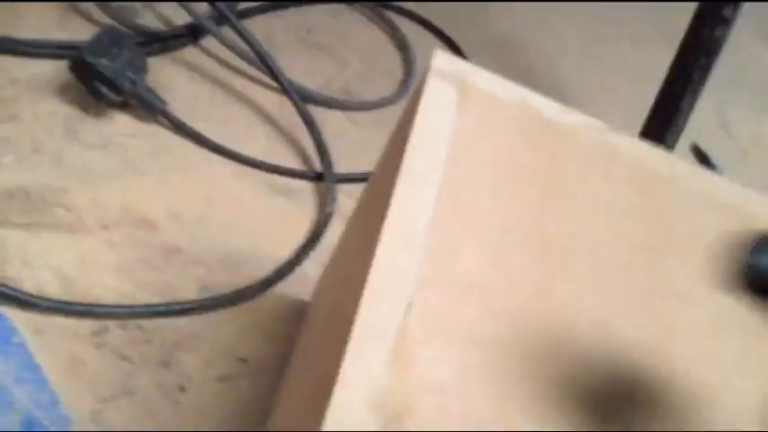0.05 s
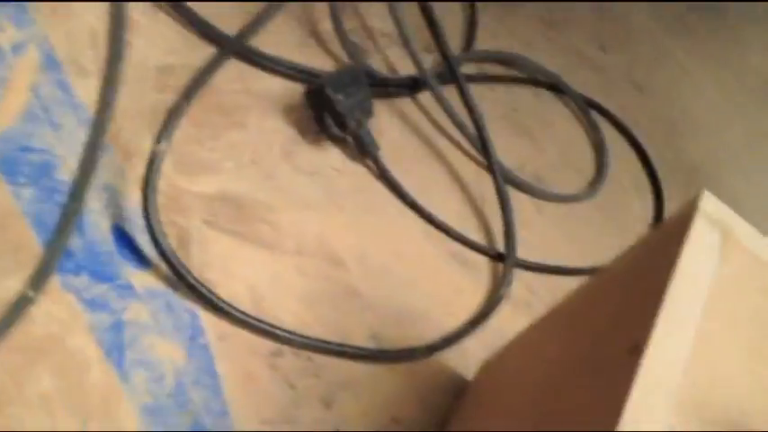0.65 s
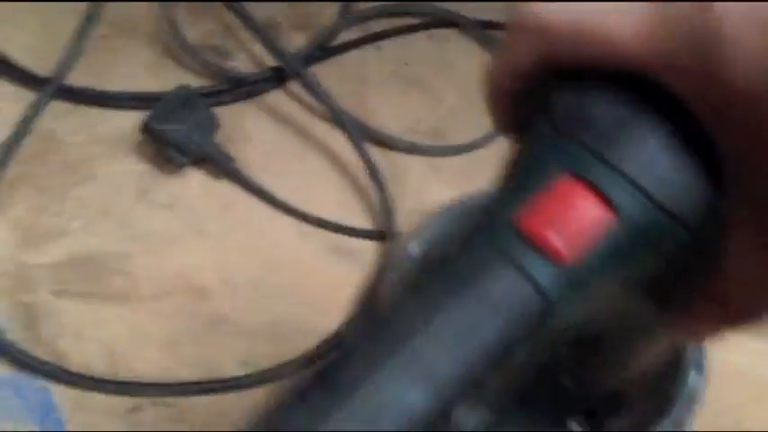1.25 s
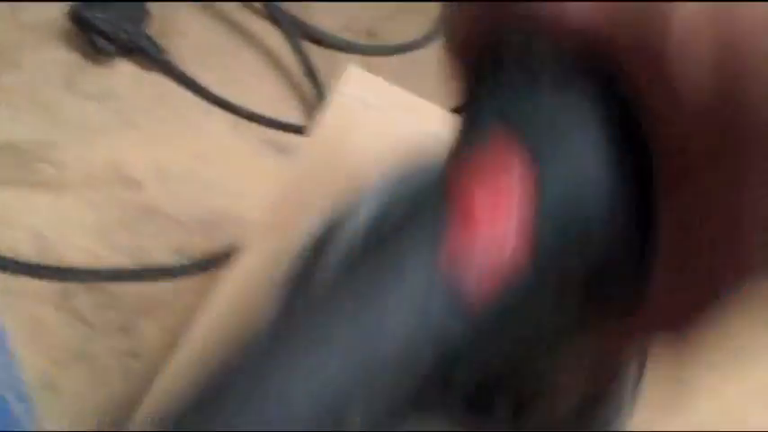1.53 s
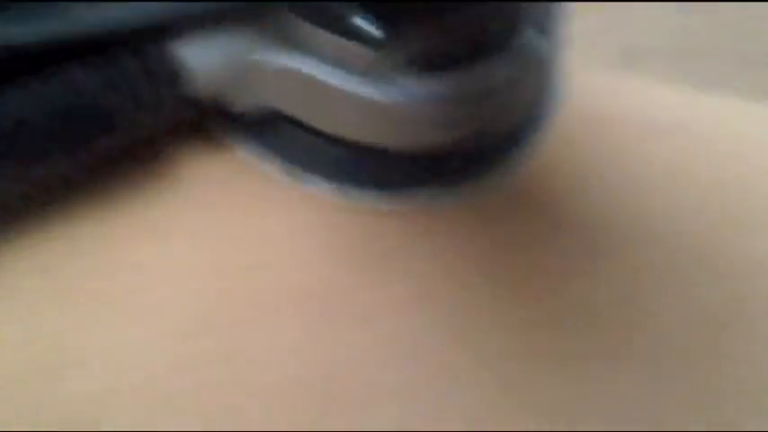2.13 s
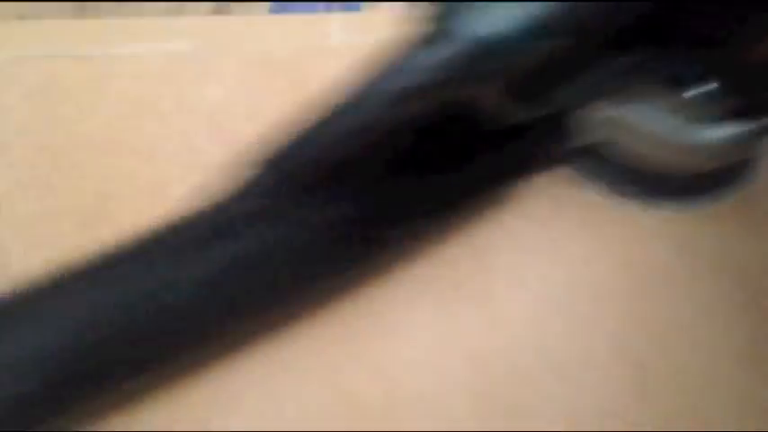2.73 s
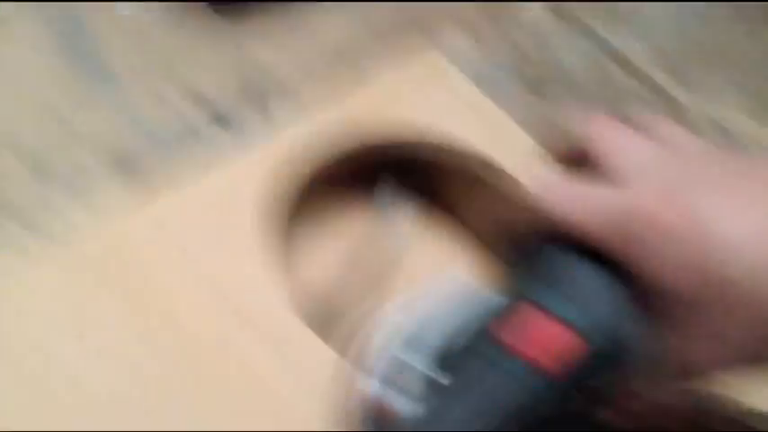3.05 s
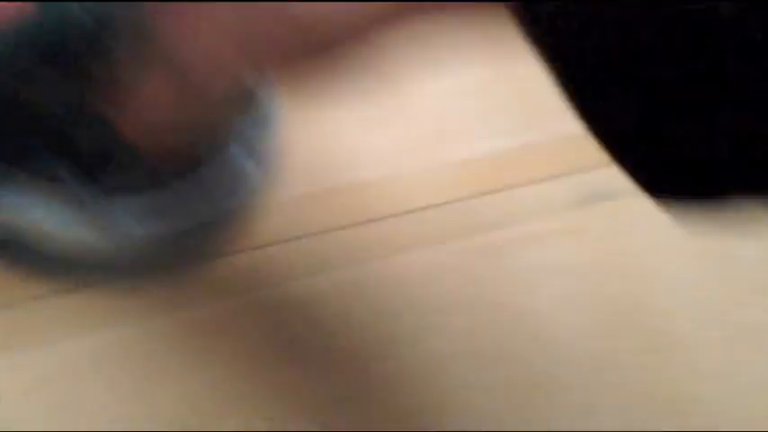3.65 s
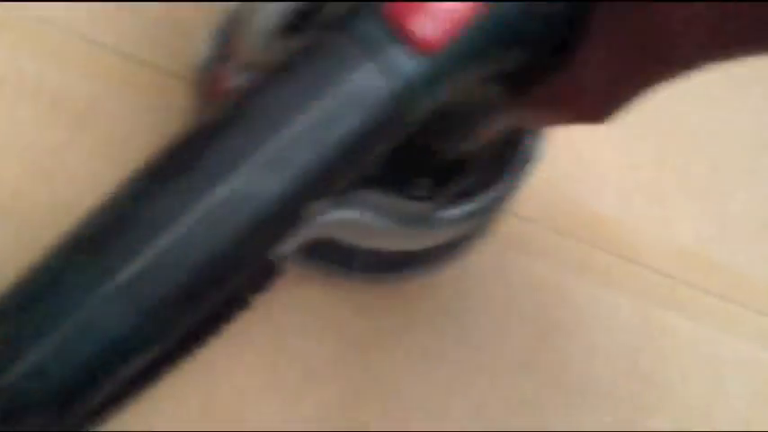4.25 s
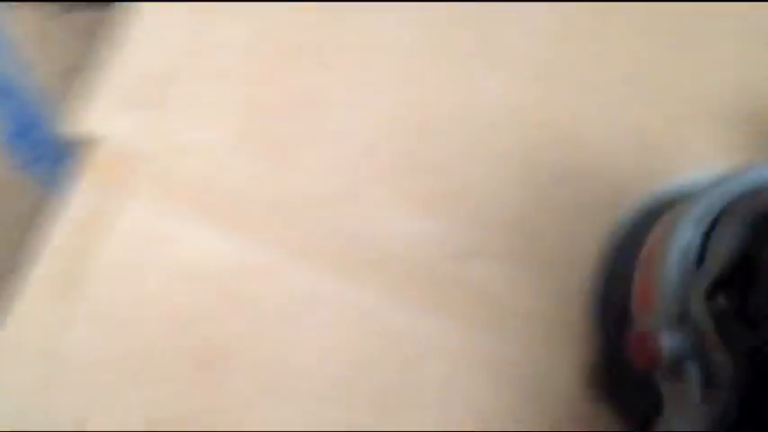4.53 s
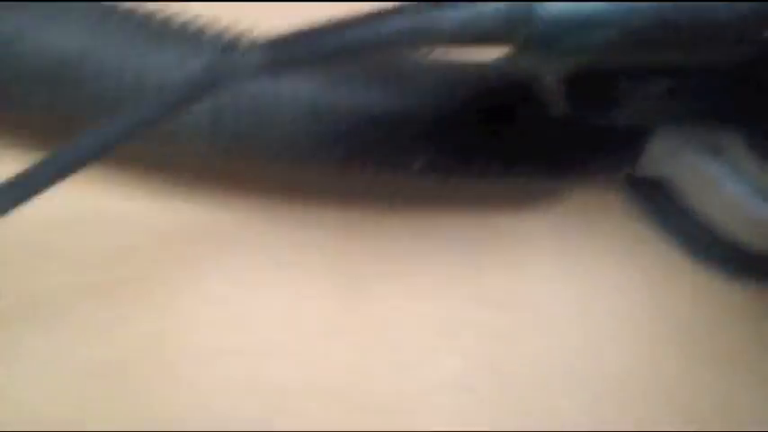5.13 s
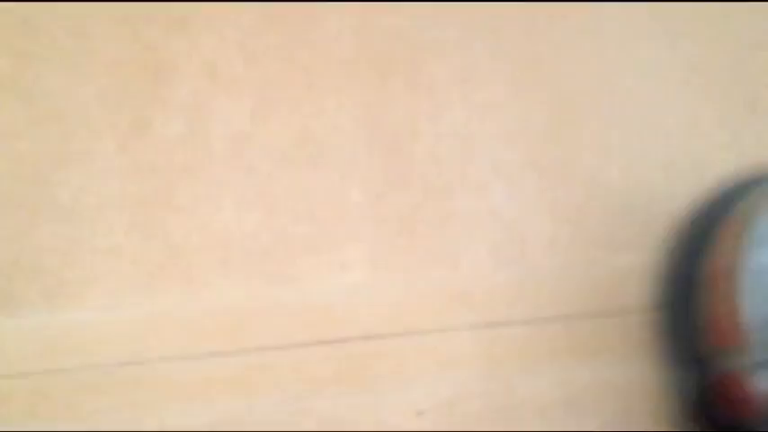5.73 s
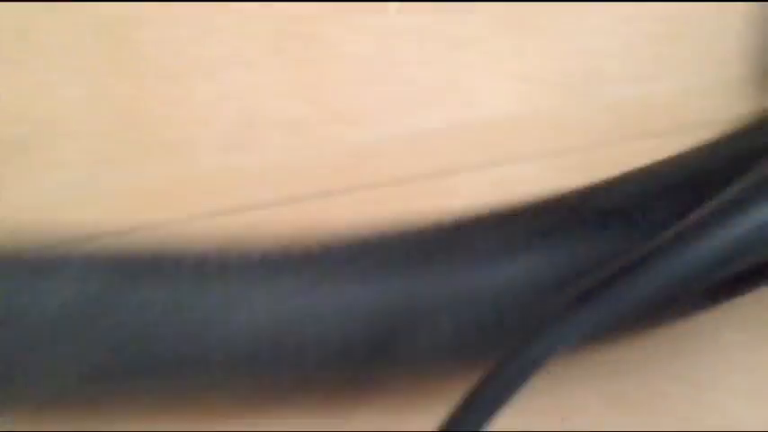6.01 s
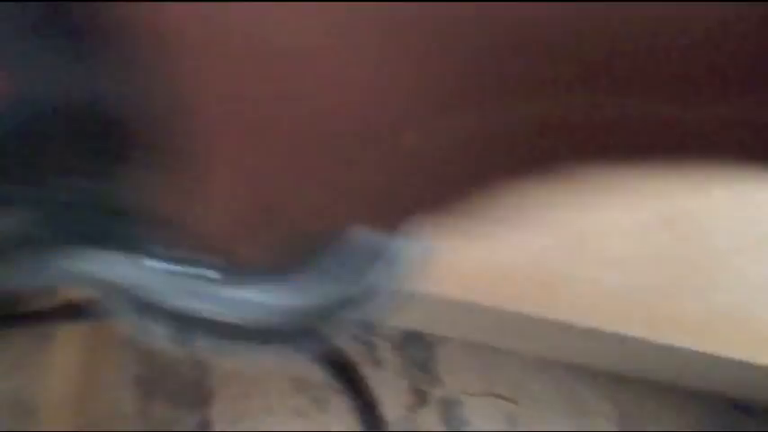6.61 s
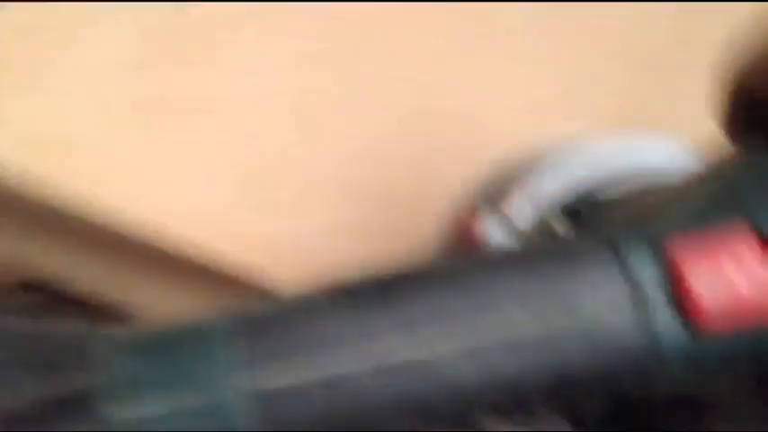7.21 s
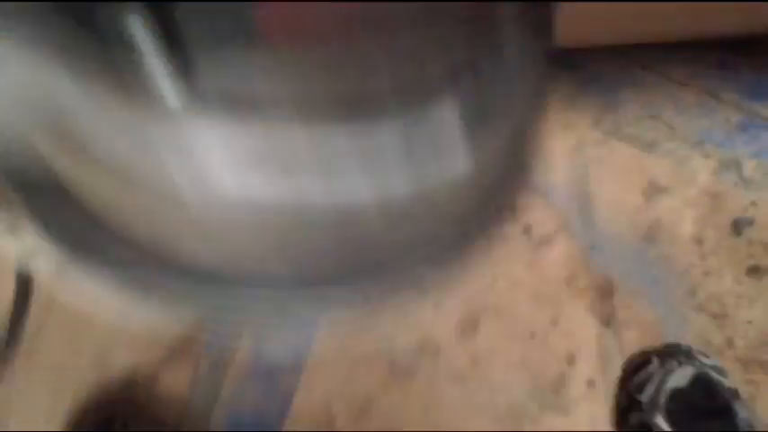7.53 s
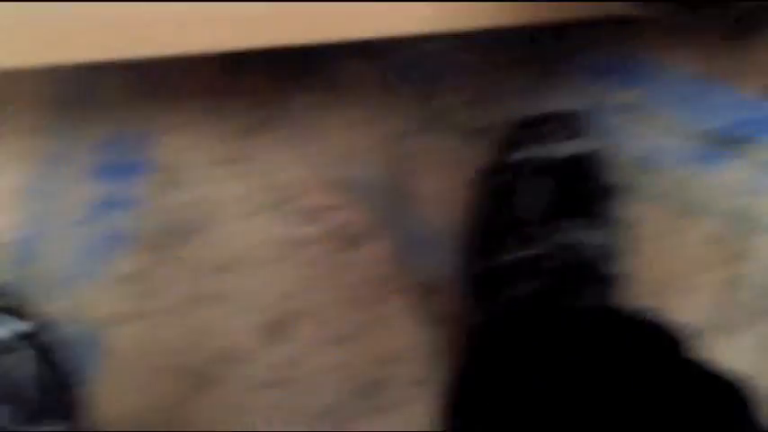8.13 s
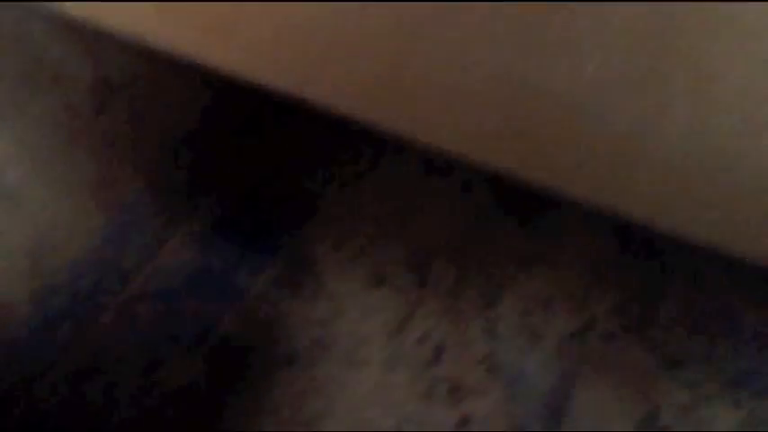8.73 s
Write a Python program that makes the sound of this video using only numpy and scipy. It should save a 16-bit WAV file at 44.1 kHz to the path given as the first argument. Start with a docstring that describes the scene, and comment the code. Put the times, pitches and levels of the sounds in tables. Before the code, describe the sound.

An electric orbital sander is already running on a wooden panel, close by in a workshop with a short echo, and continues for all nine seconds. Its motor makes a rough hum and bright buzzing whine, mixed with gritty rasping and a hiss of cooling air. A dust extractor holds one steady high pitch throughout, fading briefly around 2.4 seconds.

The sander starts fairly high, sags under pressure by about 0.7 seconds, then wavers up and down, lifting near 3 seconds and dipping lowest around 4. The buzz brightens around 1.3, 4.4 and 5.5 seconds. Thin, very high whistles swell near 3.5, 6.2, 7.1 and 8.6 seconds. From about 7.5 seconds the motor speeds up and the hum grows stronger. The pad gives one short wooden knock at 8 seconds; the pitch dips briefly, then rises again as sanding carries on.

```python
"""In a workshop, a random orbital sander is pressed and swept over a wooden panel, close by.
Its motor sags under load; hum, gear buzz and whistles follow the shaft speed.
Grit scrapes and rasps on the wood, the panel shudders and knocks, cooling air rushes from the vents.
A dust extractor on the hose holds one whine of steady pitch."""
import sys
import numpy as np
from scipy import signal
from scipy.fft import rfft, irfft, next_fast_len
from scipy.io import wavfile
from scipy.ndimage import uniform_filter1d

SR = 44100
rng = np.random.default_rng(int(sys.argv[2]) if len(sys.argv) > 2 else 0)


def dump_mix(stems):
    """Bounce the given channels to the path in sys.argv[1] as a 16-bit WAV at rate SR."""
    frames = np.atleast_2d(stems).T  # one column per channel
    limited = np.clip(frames, -1, 1)  # hard clip at full scale
    pcm = np.round(limited * 32767).astype(np.int16)
    wavfile.write(sys.argv[1], SR, pcm)


N = 395577
T = np.arange(N) / SR

# Motor sag under the hand. Each row: time in seconds, shaft speed in Hz.
SHAFT_HZ = [(0.0, 431.5), (0.15, 456.2), (0.22, 448.1), (0.37, 461.8), (0.67, 388.6), (0.92, 367.2),
            (1.15, 387.5), (1.55, 362.5), (1.6, 376.8), (1.87, 410.8), (2.0, 383.6), (2.12, 389.4),
            (2.45, 354), (2.6, 383.0), (2.85, 406), (2.95, 433.3), (3.15, 415.2), (3.3, 432.7),
            (3.62, 407.9), (3.72, 388.9), (3.92, 408.3), (4.02, 356.7), (4.1, 344.4), (4.22, 399.6),
            (4.42, 409), (4.52, 391.6), (4.72, 400.4), (4.82, 380.7), (5.27, 413.6), (5.35, 396.6),
            (5.72, 382.0), (6.02, 405.7), (6.22, 404.1), (6.32, 415.9), (6.49, 379.8), (6.75, 420.3),
            (6.85, 382.8), (7.12, 384.5), (7.22, 408), (7.39, 425.4), (7.59, 479), (8.02, 490.3),
            (8.25, 422.3), (8.39, 454.6), (8.54, 468.7), (8.97, 475.8)]
# Bite of the grit. Each row: time in seconds, relative rasp level in dB.
BITE_DB = [(0.0, -29.5), (0.12, -24), (0.2, -33), (0.32, -22.5), (0.45, -29), (1.05, -28), (1.37, -22),
           (1.65, -30), (2.47, -26), (2.97, -28.5), (3.15, -24.5), (3.77, -30), (3.92, -28), (4.05, -29.5),
           (4.24, -25), (5.09, -26.5), (5.32, -24), (5.72, -22.5), (5.77, -27.5), (6.22, -26), (6.7, -30.5),
           (6.82, -23.5), (7.27, -27), (7.64, -20), (7.74, -28), (7.97, -22), (8.19, -31), (8.29, -24.5),
           (8.67, -21.5), (8.97, -23.5)]
# Shaking of the panel. Each row: time in seconds, relative hum level in dB.
SHAKE_DB = [(0, -39.5), (1.48, -41), (1.7, -51), (2.7, -47), (2.9, -39.5), (3.5, -38), (3.8, -52),
            (4.35, -51.5), (5.1, -42.5), (5.9, -47.5), (6.12, -38.5), (6.55, -50), (6.88, -33.5),
            (7.15, -31.5), (7.25, -51), (7.63, -23.5), (7.85, -34.5), (8.05, -29), (8.25, -39),
            (8.8, -26.5)]
# Pad chatter. Each row: centre in seconds, length in seconds, added roughness.
CHATTERS = [(.5, 0.27, 0), (3.2, 0.67, 0.18), (7.347, 0.14, 0.54), (8.08, 0.11, 0.25)]
# Motor and gear harmonics. Each row: shaft multiple, relative level in dB.
HARMONICS = [(3, -10.5), (4, -8.5), (5, -7.5), (6, -9.5), (7, -14), (8, -15), (9, -10.5), (10, -11),
             (11, -13), (12, -14.5), (13, -11.5), (14, -12.5), (15, -15), (16, -15), (17, -15.5),
             (18, -11.5), (19, -10.5), (21, -9.5), (22, -22), (23, -19), (25, -23), (29, -28)]
# Housing swings close. Each row: centre in seconds, length in seconds, upper buzz gain in dB.
CLOSE_PASSES = [(1.3, .45, 3), (4.38, .45, 5.5), (5.5, .4, 6), (7.8, 0.47, 4.5), (8.65, .6, 3)]
# Housing resonances and one notch. Each row: centre in Hz, width in Hz, gain in dB.
HOUSING_MODES = [(1039, 278, 10.5), (1890, 150, -3), (2590, 160, 4), (2940, 130, 3), (5670, 1070, 5)]
# Pad crosses lively or dull spots. Each row: centre in seconds, length in seconds, pitch in Hz, gain in dB.
PANEL_SPOTS = [(.1, 0.16, 910, 9), (0.212, 0.088, 900, -8), (.2, 0.41, 5560, 5), (.25, 0.76, 1330, 5),
               (0.668, 0.091, 1170, 8), (0.635, 0.24, 5830, 8.5), (1.46, 0.12, 830, 13.5),
               (1.882, 0.16, 1860, 4.5), (2.37, 0.12, 2260, 8), (2.4, 1, 1040, -3), (3.045, 0.084, 850, 17),
               (3.3, 0.53, 1440, 8), (3.313, 0.17, 880, 16.5), (3.48, 0.038, 850, 15.5),
               (4.6, 0.54, 800, -9), (5.11, 0.13, 799.4, 12), (5.56, .25, 780, 7.5),
               (6.114, .12, 810, 15.5), (6.313, 0.32, 1840, 7.5), (6.821, 0.15, 3480, 11),
               (7.0, 0.35, 3430, 4), (7.5, 0.26, 900, 6), (7.829, .3, 1630, -11), (7.867, 1, 2809, -0.5),
               (8.201, 0.095, 3195, -11), (8.84, 0.22, 950, 12.5)]
# Fan whistle beams at the listener. Each row: centre in seconds, length in seconds, gain in dB.
FAN_BEAMS = [(1.9, 0.54, 3), (2.8, .15, 0), (3.3, 0.11, 8), (3.6, .3, 10), (5.15, 0.33, 4), (6.15, 0.35, 8),
             (7.12, .14, 14), (8.6, .6, 9)]
# Noise spectra. Each row: frequency in Hz, relative density in dB.
SCRAPE_SPECTRUM = [(80, -46), (250, -32.5), (400, -19), (600, -14.5), (850, -9), (1300, -5), (1700, -5.5),
                   (2300, 1), (3000, 1), (4000, -4), (5000, -7.5), (8000, -18)]
RASP_SPECTRUM = [(300, -62), (2500, -19), (4300, -5), (5300, 2), (6300, 4.5), (7400, 2.5), (8600, -6.5),
                 (10500, -10), (13000, -20), (16000, -30)]
AIR_SPECTRUM = [(200, -43), (1500, -3), (4000, 2), (8000, 7.5), (10000, 11), (11500, 9.5), (13500, 9),
                (16000, 6.5)]
PANEL_SPECTRUM = [(20, -13), (40, 1), (100, -4), (200, -1), (320, -3), (500, -16), (1000, -43)]
# Hand eases the pad off. Each row: centre in seconds, length in seconds, scrape gain in dB.
EASES = [(5.83, .14, -3), (7.8, 0.36, -6), (8.2, 0.1, -7)]
# Cooling air, loudest with the vents facing the listener. Each row: time in seconds, relative level in dB.
VENT_AIR_DB = [(0, -28.5), (.45, -27.5), (.75, -28.5), (1.15, -30), (1.35, -33), (3.0, -34.5), (3.2, -31.5),
               (3.7, -33.5), (6.3, -34), (6.9, -31), (7.45, -35), (7.68, -33), (7.95, -37), (8.97, -35)]
# Pad skips. Each row: centre in seconds, length in seconds, level in dB.
SKIPS = [(4.555, 0.15, -42)]
# Pad knocks the panel. Each row: start in seconds, pitch in Hz, level in dB, t60 in seconds.
KNOCKS = [(2.762, 515, -30, 0.073), (8.031, 1013, -11, 0.045), (8.034, 526, -26, 0.085)]
# Extractor whine. Each row: time in seconds, level in dB.
WHINE_DB = [(0, -30), (.7, -26.5), (1.7, -35), (2.0, -36), (2.4, -51), (2.9, -35), (3.7, -36.5),
            (4.35, -27.5), (5.1, -29), (6.35, -33), (6.82, -26), (7.55, -28), (7.8, -32), (8.4, -30.5),
            (8.7, -25), (8.97, -27.5)]

# Each law: base level in dB, dB per dB of bite, dB per Hz of shaft speed.
OCTAVE_LAW, SHUDDER_LAW = (-43.5, 0.13, -0.052), (-72.5, 0.3, -0.064)
LOW_BUZZ_LAW, HIGH_BUZZ_LAW = (-32.5, 0.46, 0.02), (-36, 1, 0.002)
COMMUTATOR_LAW, FAN_LAW = (-43, 0.43, 0.01), (-47.5, -0.89, 0.034)
SCRAPE_LAW = (-31.5, 0.47, 0.027)
FREE_SHAFT_HZ, COMMUTATOR_BARS, FAN_BLADES = 494.3, 20, 24


def sander():
    """Speed, bite and shake drive the parts; buzz and sanding noise fill the room."""
    shaft_hz = curve(SHAFT_HZ)
    shake_db = curve(SHAKE_DB)
    rasp_db = curve(BITE_DB) + 0.8 * walk(26)  # uneven hand pressure
    bite_db = rasp_db - np.mean(rasp_db)
    rough = 0.34 + 0.88 * load(shaft_hz) + swells(CHATTERS)
    turns = shaft_turns(shaft_hz)
    hum = motor_hum(turns, shaft_hz, bite_db, shake_db, rough)
    commutator_db = follow(COMMUTATOR_LAW, bite_db, shaft_hz)
    commutator = whistle(COMMUTATOR_BARS, turns, shaft_hz, commutator_db, 0.98 * rough)
    fan_db = follow(FAN_LAW, bite_db, shaft_hz) + swells(FAN_BEAMS)
    fan = whistle(FAN_BLADES, turns, shaft_hz, fan_db, rough)
    buzz = gear_buzz(turns, shaft_hz, bite_db, rough)
    scrape_db = follow(SCRAPE_LAW, bite_db, shaft_hz) + swells(EASES)
    scrape = sanding(turns, SCRAPE_SPECTRUM, depth=0.27) * undb(scrape_db)
    rasp = sanding(turns, RASP_SPECTRUM, depth=0.48) * undb(rasp_db - 2)
    air = cooling_air(bite_db)
    shudder = panel_shudder(shaft_hz, bite_db, shake_db)
    contact = workshop(buzz + scrape + rasp)
    return hum + commutator + fan + contact + air + shudder + pad_skips(turns) + panel_knocks()


def shaft_turns(shaft_hz, wobble=0.014, flutter=0.001):
    """Shaft angle; the gripping pad tugs at the speed, more under load."""
    speed_ratio = 1 + wobble * load(shaft_hz) * walk(40) + flutter * walk(170)
    return np.cumsum(shaft_hz * speed_ratio) / SR


def load(shaft_hz):
    """Share of free speed lost."""
    return np.clip(1 - shaft_hz / FREE_SHAFT_HZ, 0, 1)


def motor_hum(turns, shaft_hz, bite_db, shake_db, rough):
    """Shaft fundamental and octave, each stuttering under load."""
    fundamental = tone(turns, shake_db - 1.76 + stutter_db(shaft_hz), 0.25 * rough)
    octave_db = follow(OCTAVE_LAW, bite_db, shaft_hz) + resonance_db(2 * shaft_hz)
    return fundamental + tone(2 * turns, octave_db + stutter_db(shaft_hz), 0.65 * rough)


def stutter_db(shaft_hz):
    """Brief dropouts that deepen with load."""
    grip = np.minimum(walk(30), 0.7) + 0.15
    return 21.5 * load(shaft_hz) * grip


def gear_buzz(turns, shaft_hz, bite_db, rough, echo_gain=0.89):
    """Shaft harmonics beat with their moving echo off the panel; upper ones grow most with bite."""
    low_db = follow(LOW_BUZZ_LAW, bite_db, shaft_hz)
    high_db = follow(HIGH_BUZZ_LAW, bite_db, shaft_hz) + swells(CLOSE_PASSES)
    out = 0
    for order, db in HARMONICS:
        upper = np.clip((order - 6) / 5, 0, 1)
        echo_db = 20 * np.log10(np.abs(1 + echo_gain * np.exp(2.2j * walk(10))))
        drive_db = (1 - upper) * low_db + upper * high_db
        level_db = db + drive_db + resonance_db(order * shaft_hz) + echo_db
        out = out + tone(order * turns, level_db, rough * (1 - 0.34 * upper))
    return out


def resonance_db(hz, spot_width_ratio=0.23):
    """Gain of a partial passing through housing and panel resonances."""
    housing_db = sum(db * peak(hz, centre_hz, width_hz) for centre_hz, width_hz, db in HOUSING_MODES)
    panel_db = 0
    for centre_s, length_s, spot_hz, db in PANEL_SPOTS:
        band = np.exp(-((hz / spot_hz - 1) / spot_width_ratio) ** 2)
        panel_db = panel_db + db * swell(centre_s, length_s) * band
    return housing_db + panel_db


def whistle(order, turns, shaft_hz, db, rough, waver_db=4):
    """A high shaft multiple; sings near the vent slot resonance, wavers as the tool moves."""
    vent_db = 6.5 * peak(order * shaft_hz, centre_hz=9190, width_hz=1550)
    return tone(order * turns, db + vent_db + waver_db * walk(16), rough)


def sanding(turns, spectrum, depth, impacts_per_s=30000, spread_db=1.5):
    """Grit tears at the wood in tiny impacts, harder once a turn; pad and panel colour it."""
    hits = rng.random(N) < impacts_per_s / SR
    grit = unit(hits * rng.standard_normal(N) * undb(spread_db * rng.standard_normal(N)))
    push = 1 + depth * np.cos(2 * np.pi * turns)
    return patchy(colour(grit * push, spectrum), spread_db=2)


def cooling_air(bite_db):
    """Air rushes from the vents, louder with bite."""
    rush = patchy(colour(rng.standard_normal(N), AIR_SPECTRUM), spread_db=0.9)
    return rush * undb(curve(VENT_AIR_DB) + 4.5 + 0.31 * bite_db + 0.7 * walk(24))


def panel_shudder(shaft_hz, bite_db, shake_db):
    """Low noise of the shaken panel."""
    level_db = follow(SHUDDER_LAW, bite_db, shaft_hz) + 0.69 * (shake_db - np.mean(shake_db))
    return colour(rng.standard_normal(N), PANEL_SPECTRUM) * undb(level_db + 2.7 * walk(33))


def pad_skips(turns):
    """A skip every second turn sounds halfway between shaft harmonics."""
    out = 0
    for centre_s, length_s, db in SKIPS:
        gate = np.exp(-(2 * (T - centre_s) / length_s) ** 4)
        out = out + gate * (tone(1.5 * turns, db, rough=0.2) + tone(2.5 * turns, db - 1.5, rough=0.3))
    return out


def panel_knocks(attack_s=0.0019):
    """Soft blows, each a quickly damped ring of the wood."""
    out = 0
    for start_s, hz, db, t60_s in KNOCKS:
        age_s = np.maximum(T - start_s, 0)
        envelope = (1 - np.exp(-age_s / attack_s)) * undb(db - 60 * age_s / t60_s)
        out = out + envelope * np.sin(2 * np.pi * hz * age_s)
    return out


def extractor(whine_hz=1206, reflected_db=-42):
    """The turbine holds its pitch; the whine beats with its reflections as the listener moves."""
    turns = np.cumsum(whine_hz * (1 + 0.00062 * walk(12))) / SR
    reflected = np.sqrt(2) * np.real(scatter(13) * np.exp(2j * np.pi * turns))
    direct = tone(turns, curve(WHINE_DB) + 0.57 * walk(20), rough=0.09)
    return direct + undb(reflected_db) * reflected


def workshop(x, t60_s=0.28, wet_db=-11, gap_s=0.004):
    """Adds a short tail from near walls and benches."""
    t = T[:SR // 2]
    tail = rng.standard_normal(len(t)) * undb(-60 * t / t60_s) * (t > gap_s)
    tail /= np.sqrt(np.sum(tail ** 2))
    return x + undb(wet_db) * signal.fftconvolve(x, tail)[:N]


def tone(turns, db, rough):
    """One partial at an rms level; roughness moves its power into a noise skirt."""
    rough = np.clip(rough, 0, 1)
    amplitude = np.sqrt(1 - rough ** 2) + rough * scatter(130)
    return np.sqrt(2) * undb(db) * np.real(amplitude * np.exp(2j * np.pi * (turns + rng.random())))


def colour(x, spectrum):
    """Filter by (Hz, dB) points; rms 1."""
    hz, db = np.transpose(spectrum)
    size = next_fast_len(N)
    bins_hz = np.maximum(np.arange(size // 2 + 1) * SR / size, 1)
    gain = undb(np.interp(np.log(bins_hz), np.log(hz), db))
    return unit(irfft(rfft(x, size) * gain, size)[:N])


def patchy(x, spread_db):
    """Bands swell and fade on their own as the contact shifts; rms 1."""
    spectra = signal.stft(x, nperseg=512)[2]
    field = rng.standard_normal(spectra.shape)
    for axis in (0, 1, 0, 1):
        field = uniform_filter1d(field, size=8, axis=axis)
    return unit(signal.istft(spectra * undb(spread_db * unit(field)))[1][:N])


def follow(law, bite_db, shaft_hz):
    """Level in dB from bite and speed."""
    base_db, db_per_db, db_per_hz = law
    return base_db + db_per_db * bite_db + db_per_hz * (shaft_hz - np.mean(shaft_hz))


def walk(rate_hz):
    """Smooth random drift; rms 1."""
    points = rng.standard_normal(int(N / SR * rate_hz) + 4)
    fine = signal.resample_poly(points, up=8, down=1)
    return unit(np.interp(T * rate_hz * 8, np.arange(len(fine)), fine))


def scatter(rate_hz):
    """Random amplitude and phase; rms 1."""
    return (walk(rate_hz) + 1j * walk(rate_hz)) / np.sqrt(2)


def curve(table):
    """Straight lines through (time, value) rows."""
    return np.interp(T, *np.transpose(table))


def swell(centre_s, length_s):
    """Smooth rise and fall; top 1."""
    return np.exp(-(2 * (T - centre_s) / length_s) ** 2)


def swells(table):
    """Sum of scaled swells."""
    return sum(size * swell(centre_s, length_s) for centre_s, length_s, size in table)


def peak(hz, centre_hz, width_hz):
    """Resonance shape; top 1."""
    return 1 / (1 + (2 * (hz - centre_hz) / width_hz) ** 2)


def undb(db):
    """Decibels to gain."""
    return 10 ** (np.asarray(db) / 20)


def unit(x):
    """Scale to rms 1."""
    return x / np.sqrt(np.mean(x ** 2))


def scene():
    """Both machines, same in both channels."""
    mono = sander() + extractor()
    return np.array([mono, mono])


def record(dry):
    """Steep low-pass on the top treble."""
    cutoff_hz = 15750
    return signal.sosfilt(signal.ellip(12, 0.1, 80, cutoff_hz, fs=SR, output="sos"), dry)


dry = scene()
out = record(dry)
dump_mix(out)
```